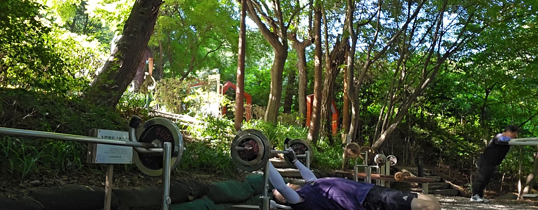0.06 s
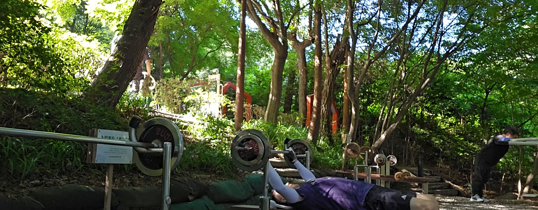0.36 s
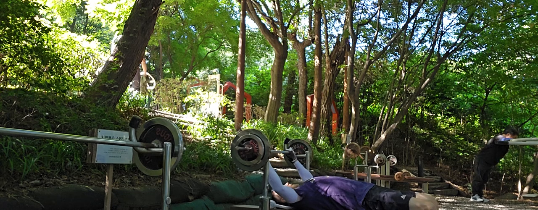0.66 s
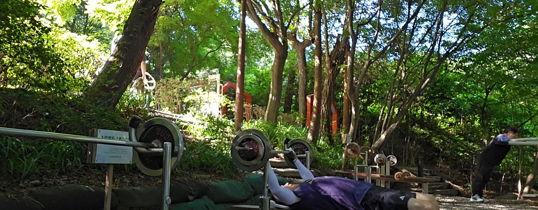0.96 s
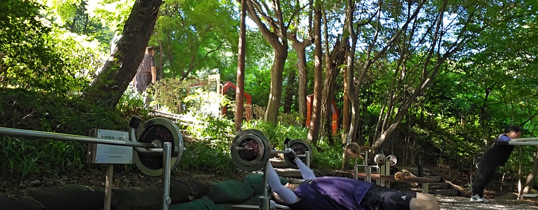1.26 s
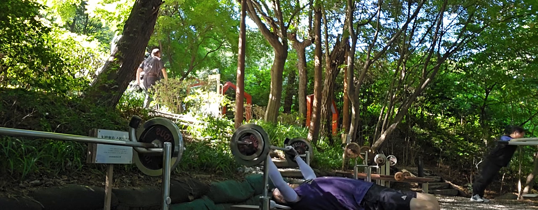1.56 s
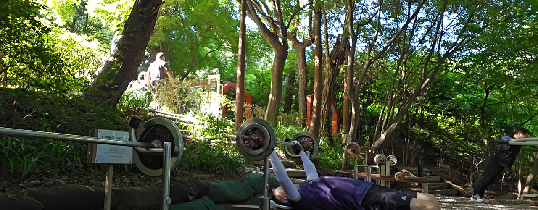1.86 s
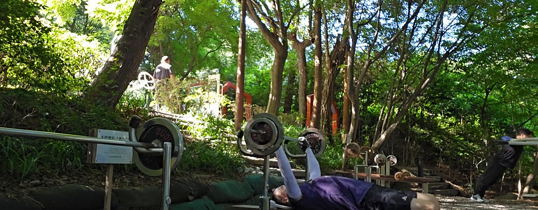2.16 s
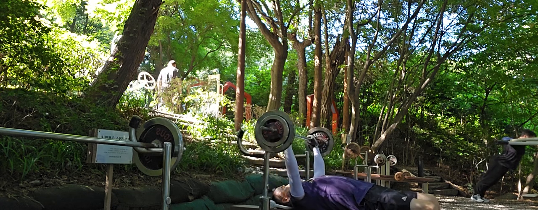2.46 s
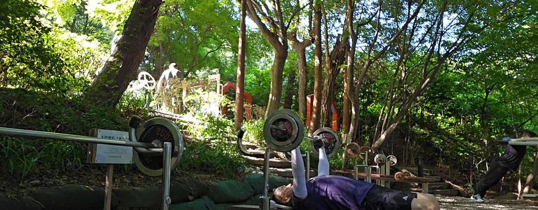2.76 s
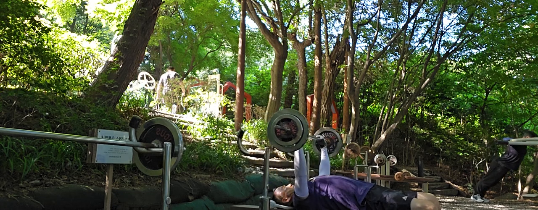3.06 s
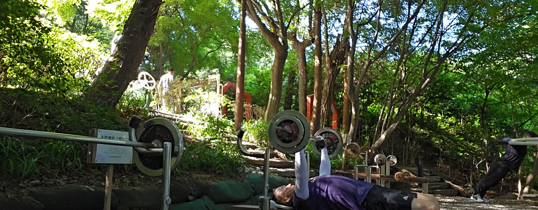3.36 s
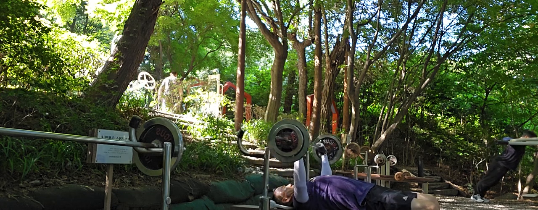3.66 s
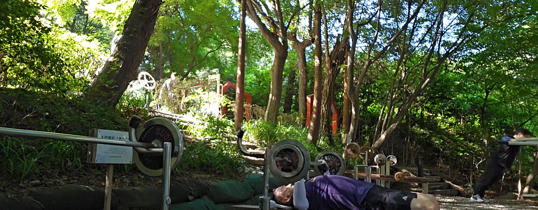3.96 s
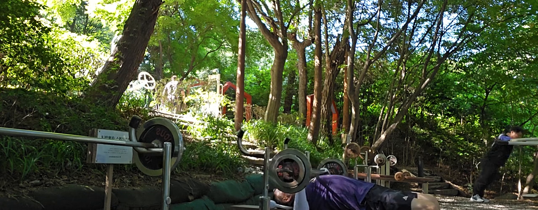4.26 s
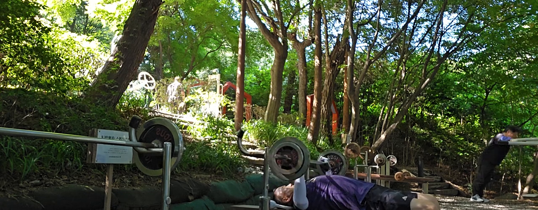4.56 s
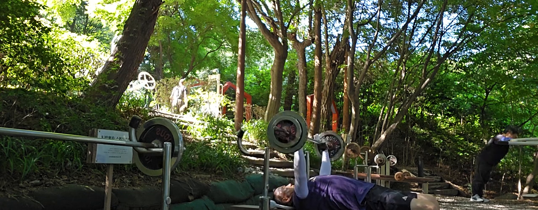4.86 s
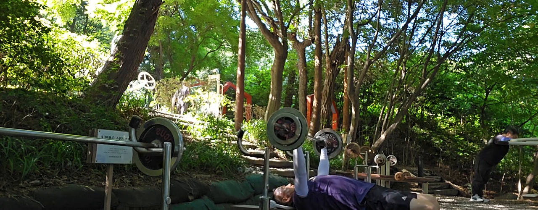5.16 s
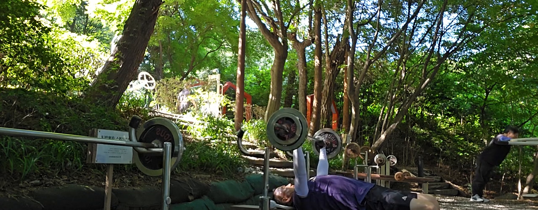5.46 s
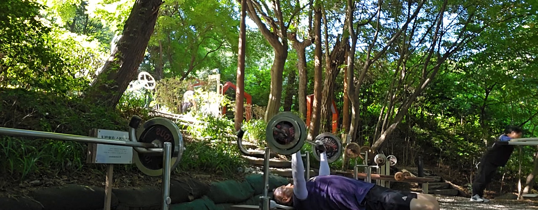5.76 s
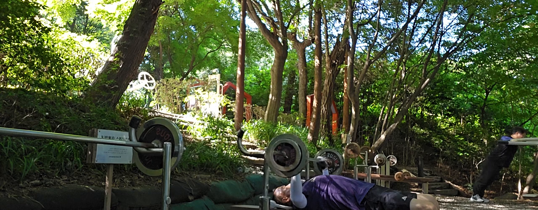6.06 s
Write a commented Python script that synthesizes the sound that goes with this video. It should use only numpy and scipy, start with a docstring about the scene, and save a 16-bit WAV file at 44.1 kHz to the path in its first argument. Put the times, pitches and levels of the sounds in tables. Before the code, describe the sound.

A steady distant traffic rumble and twittering birds, with a barbell tick, soft gritty scuffs and a short clink of sliding weight plates.

```python
"""Small birds chip and twitter over a low city rumble, at an outdoor gym in a wooded park.
A barbell ticks in its hook, shoes crush grit and heels knock on packed earth. About four seconds in,
the loose plates slide along the bar: friction makes them rasp and squeak, and impacts ring the steel.
Trunks and leaves scatter the birdsong and the sounds of the gym into a short reverberation."""
import sys
import numpy as np
from scipy import signal
from scipy.fft import rfft, irfft, next_fast_len
from scipy.io import wavfile
from scipy.ndimage import uniform_filter1d, map_coordinates

SR = 44100
rng = np.random.default_rng(int(sys.argv[2]) if len(sys.argv) > 2 else 0)


def persist_wave(psi):
    """Save psi, clipped to +-1, as 16-bit WAV."""
    counts = np.round(np.clip(psi, -1, 1) * 32767).astype(np.int16)
    wavfile.write(sys.argv[1], SR, np.atleast_2d(counts).T)


N = 274302


def amp(db):
    """Amplitude ratio of a level in decibels."""
    return 10 ** (np.asarray(db) / 20)


def unit(x):
    """Normalisation to rms 1."""
    return x / np.sqrt(np.mean(x ** 2) + 1e-20)


def along(points, hz):
    """Interpolation of (frequency, value) points on a logarithmic frequency axis."""
    point_hz, values = np.transpose(points)
    return np.interp(np.log(hz + 1), np.log(point_hz + 1), values)


def curves(rows, size):
    """Linear interpolation in time: one value per sample for each column after the first."""
    time_s, *columns = np.transpose(rows)
    return [np.interp(np.arange(size) / SR, time_s, column) for column in columns]


def wobble(rate, size=N):
    """Random modulation: a smooth curve through `rate` Gaussian values a second."""
    knots = rng.standard_normal(int(size * rate / SR) + 4)
    return map_coordinates(knots, [np.arange(size) * rate / SR])


def filtered(x, response):
    """Linear filtering: the spectrum of x times a frequency response."""
    size = x.shape[-1]
    padded = next_fast_len(size + 8192)
    return irfft(rfft(x, padded) * response(np.fft.rfftfreq(padded, 1 / SR)), padded)[..., :size]


def coloured(x, spectrum):
    """Spectral shaping by (frequency_hz, level_db) points, at rms 1."""
    return unit(filtered(x, lambda hz: amp(along(spectrum, hz))))


def add(track, start_s, sound):
    """Superposition of a sound on a track."""
    part = track[:, max(round(start_s * SR), 0):][:, :sound.shape[-1]]
    part += sound[..., :part.shape[-1]]


def grains(rate, spread_db, size=N):
    """Shot noise: a stereo train of tiny random fractures, `rate` a second."""
    impulses = (rng.random((2, size)) < rate / SR) * rng.standard_normal((2, size))
    return impulses * amp(spread_db * rng.standard_normal(size))


def diffuse(spectrum):
    """A diffuse field is coherent between two points in the bass and incoherent in the treble."""
    # frequency_hz, coherence
    likeness = [(30, 0.98), (120, 1), (250, 0.92), (500, 0.77), (1000, 0), (10000, 0.033)]

    def mid_and_side(hz):
        """Equal-power weights that give this coherence."""
        angle = np.arccos(np.clip(along(likeness, hz), -1, 1)) / 2
        return np.array([np.cos(angle), np.sin(angle)])

    mid, side = filtered(rng.standard_normal((2, N)), mid_and_side)
    return coloured(np.array([mid + side, mid - side]), spectrum)


def woods(x, wet_db, early_s=0.024):
    """Scattering by trunks and leaves adds strong single echoes early and a fading wash later."""
    # frequency_hz, t60_s
    reverberation = [(300, 0.74), (4000, 0.67), (8000, 0.67), (15000, 0.19)]
    size = SR // 2
    early = np.exp(-np.arange(size) / SR / early_s)
    trunks = 18 * early * (rng.random((2, size)) < 250 / SR)
    hz, t, spectra = signal.stft(rng.standard_normal((2, size)) * (1 + trunks), SR, nperseg=256)
    decay = amp(-60 * t / along(reverberation, hz)[:, None])
    tail = signal.istft(spectra * decay, SR, nperseg=256)[1]
    tail /= np.linalg.norm(tail, axis=1, keepdims=True)
    echo = signal.fftconvolve(np.atleast_2d(x), tail, axes=1)[:, :x.shape[-1]]
    return (x + amp(wet_db) * echo) / np.hypot(1, amp(wet_db))


def city():
    """Diffuse traffic rumble and receding tyre noise, low engine drones, and two faint high tones."""
    # centre_hz, width_hz, level_db
    drone_bands = [(57.24, 8, -54), (94.9, 8, -57), (224.9, 13, -69), (1287, 12, -89), (1866, 12, -88)]
    # frequency_hz, level_db
    rumble_spectrum = [(12, -41), (20, -7.5), (43, -2), (68, 0.5), (97, -3.5), (161, -11), (227, -12.5),
                       (330, -25.5), (430, -52.5), (730, -120)]
    # frequency_hz, level_db
    tyre_spectrum = [(200, -12), (290, -4), (400, -2.5), (560, -7.5), (700, -10), (900, -13.5), (1200, -18),
                     (1700, -23.5), (2050, -33.5), (2600, -60.5)]
    t = np.arange(N) / SR
    drones = np.zeros(N)
    for hz, width_hz, db in drone_bands:
        modulation = wobble(width_hz) + 1j * wobble(width_hz)
        drones += amp(db) * unit(np.real(modulation * np.exp(2j * np.pi * hz * t)))
    rumble = amp(-46.5 + 1.1 * wobble(4.94)) * diffuse(rumble_spectrum)
    tyres = amp(-61.5 - 0.3842 * t + 1.22 * wobble(9)) * diffuse(tyre_spectrum)
    return rumble + tyres + drones


def patchy(x, depth_db):
    """Modulation in patches of time and frequency, as when single branches rustle in turn."""
    spectra = signal.stft(x, nperseg=512)[2]
    across_bands = uniform_filter1d(rng.standard_normal(spectra.shape[1:]), size=5, axis=0)
    patches = unit(uniform_filter1d(across_bands, size=14, axis=1))
    return unit(signal.istft(spectra * amp(depth_db * patches), nperseg=512)[1][:, :N])


def leaves():
    """Wind excites broadband noise in the foliage, which swells with each breath."""
    # peak_s, lift_db, half_length_s
    gusts = [(0, 5.5, 0.16), (0.853, 3, 0.65), (3.453, 5, 0.6), (4.41, 7.5, 0.15)]
    # frequency_hz, level_db
    rustle_spectrum = [(1500, -8), (2100, 3), (2650, 3.5), (3300, 4.5), (4300, 3.5), (5000, -1.5),
                       (5800, -5), (6400, -0.5), (6850, -12.5), (7350, 0.5), (8300, -15), (9300, -37),
                       (15500, -33.5)]
    t = np.arange(N) / SR
    gust_db = sum(db * np.exp(-((t - peak_s) / half_s) ** 2) for peak_s, db, half_s in gusts)
    return amp(-77.5 + gust_db + wobble(5.1)) * patchy(diffuse(rustle_spectrum), depth_db=2.5)


def hiss():
    """Self-noise of the microphones, faint and high."""
    # frequency_hz, level_db
    spectrum = [(8000, -21), (10000, -8.5), (11000, -7), (11700, 2.5), (12500, -0.5), (15500, -2.5)]
    return amp(-96) * diffuse(spectrum)


def bird(shape, calls, rough, flutter_db, wet_db, pan_db):
    """A gliding whistle with a faint octave quavers by random frequency and amplitude modulation."""
    out, size = np.zeros((2, N)), SR // 2
    pitch_hz, contour_db = curves(shape, size)
    t = np.arange(size) / SR
    length_s = shape[-1][0]
    gate = np.clip(np.minimum(t, length_s - t) / 0.00066, 0, 1)
    for start_s, db, ratio in calls:
        phase = 2 * np.pi * np.cumsum(pitch_hz * ratio * (1 + rough * wobble(294.2, size))) / SR
        whistle = np.sin(phase) + amp(-44) * np.sin(2 * phase)
        envelope = gate * amp(db + contour_db + flutter_db * wobble(120.2, size))
        call = np.sqrt(2) * envelope * whistle
        scattered = woods(call, wet_db, early_s=0.034)
        add(out, start_s, call.std() * unit(scattered))  # smeared, with its energy kept
    return out * amp([[pan_db / 2], [-pan_db / 2]])


def arched_song():
    """Frequency modulation: a bird in the canopy repeats one rising and falling syllable."""
    # time_s, pitch_hz, level_db
    arch = [(0, 3533, -7.5), (.007, 3662, -6.5), (.017, 3830, -5), (.031, 4130, 1), (.044, 4400, -3.5),
            (.056, 4468, -4.5), (.066, 4100, -3.5), (.078, 3730, -7.5), (.1, 3653, -11.5)]
    # start_s, level_db, pitch_ratio
    calls = [(0.727, -58.5, 0.99), (1.083, -60, 0.98), (1.413, -60.5, 0.97), (2.904, -58.5, 0.995),
             (3.243, -60, 0.99), (3.573, -58, 1), (3.885, -59, 0.99), (4.481, -58, 0.98)]
    return bird(arch, calls, rough=0.017, flutter_db=2, wet_db=6, pan_db=-1)


def far_song():
    """Scattered sound outweighs direct in a far bird's hoarse slur, high whistle and quick drop."""
    # time_s, pitch_hz, level_db
    slur = [(0, 3640, -8), (.012, 4200, 0.5), (.028, 4850, -2), (.044, 5390, -5.5)]
    # time_s, pitch_hz, level_db
    crest = [(0, 5990, -6), (.014, 6140, -6), (.028, 6430, 2), (.05, 6480, -1.5), (.066, 6320, -8)]
    # time_s, pitch_hz, level_db
    drop = [(0, 4590, -10), (.008, 3870, 0.5), (.018, 3250, -2.5)]
    # start_s, slur_db, crest_db, drop_db, pitch_ratio
    phrases = [(4.751, -65.5, -66.5, -81, 1), (5.062, -67, -64.5, -66.5, 1), (5.327, -65.5, -68, -64, 1),
               (5.595, -65, -64.5, -63.5, 0.95)]
    slurs = [(s, db, ratio) for s, db, _, _, ratio in phrases]
    crests = [(s + 0.06, db, ratio) for s, _, db, _, ratio in phrases]
    drops = [(s + 0.127, db, ratio) for s, _, _, db, ratio in phrases]
    return (bird(slur, slurs, rough=0.05, flutter_db=4, wet_db=13, pan_db=1)
            + bird(crest, crests, rough=0.021, flutter_db=3.5, wet_db=12, pan_db=-0.5)
            + bird(drop, drops, rough=0.07, flutter_db=3, wet_db=13, pan_db=-1))


def twitter():
    """The ratio of scattered to direct sound sets each short glide at its own depth in the trees."""
    # start_s, length_s, level_db, first_hz, last_hz, wet_db
    notes = [(0.059, 0.045, -71, 6370, 6500, 6), (0.074, 0.034, -70, 4480, 4630, 2),
             (0.172, .015, -59.5, 5650, 5930, -19), (0.848, 0.037, -79, 6330, 6270, 2),
             (0.858, 0.015, -72, 5700, 4960, -1), (.898, .014, -69, 5250, 5950, 1),
             (.913, .014, -72, 5850, 5300, -2), (0.956, 0.032, -71.5, 6120, 6300, 1),
             (2.439, 0.041, -68, 6300, 6270, 5), (2.467, 0.023, -65.5, 5100, 4930, -1),
             (2.573, 0.021, -73.5, 5360, 6000, 1), (2.613, 0.028, -63, 4210, 5000, -2),
             (2.824, 0.037, -75.5, 7680, 7000, 10), (2.858, 0.051, -70.5, 6620, 5560, 10),
             (2.987, 0.047, -66.5, 7080, 7600, 8), (5.411, 0.031, -68, 4360, 4290, 2.5),
             (5.44, 0.041, -70, 4950, 4880, 4), (5.685, .03, -75, 4140, 4137, 2),
             (5.763, 0.029, -75.5, 4170, 4700, 2)]
    out, edge_db = np.zeros((2, N)), -6
    for start_s, length_s, db, first_hz, last_hz, wet_db in notes:
        middle_hz = (first_hz + last_hz) / 2
        glide = [(0, first_hz, edge_db), (length_s / 2, middle_hz, 0), (length_s, last_hz, edge_db)]
        out += bird(glide, [(start_s, db, 1)], rough=0.022, flutter_db=2.5, wet_db=wet_db, pan_db=2.5)
    return out


def near_chips():
    """Biphonation: one side of a nearer bird's syrinx sweeps upward while the other holds a note."""
    # time_s, pitch_hz, level_db
    sweep = [(0, 4500, -18), (.006, 4850, -2), (.012, 5700, -2.5), (.017, 6600, -3.5), (.021, 6900, -11)]
    # time_s, pitch_hz, level_db
    pip = [(0, 5100, 1), (.006, 5280, 1.5), (.014, 5300, -4), (.02, 5150, -13.5)]
    # start_s, sweep_db, pip_db, pitch_ratio
    chips = [(.174, -60.5, -57.5, 1.025), (.289, -62, -61, 1.0), (2.615, -75, -74, 0.95)]
    sweeps = [(s, db, ratio) for s, db, _, ratio in chips]
    pips = [(s + 0.01, db, ratio) for s, _, db, ratio in chips]
    return (bird(sweep, sweeps, rough=0.0093, flutter_db=2.5, wet_db=-5, pan_db=2.5)
            + bird(pip, pips, rough=0.006, flutter_db=1, wet_db=-13, pan_db=0))


def footfalls():
    """Inelastic impact: a heel lands on packed earth with a short, dull knock."""
    # start_s, level_db, decay_s
    steps = [(1.036, -53.5, 0.012), (3.711, -53, .015), (3.741, -57, 0.02), (4.435, -59.5, .018)]
    # frequency_hz, level_db
    earth_spectrum = [(200, -10.5), (450, 2), (680, 1.5), (1000, -5.5), (1500, -13.5), (3000, -32),
                      (6000, -69)]
    out, t = np.zeros((2, N)), np.arange(SR // 5) / SR
    for start_s, db, decay_s in steps:
        envelope = amp(db) * (1 - np.exp(-t / 0.0018)) * np.exp(-t / decay_s)
        add(out, start_s, envelope * coloured(rng.standard_normal(len(t)), earth_spectrum))
    return woods(out, wet_db=-5)


def shoes():
    """Granular fracture: each scuff crushes a swell of grit; weight on the foot adds a lower crunch."""
    # peak_s, level_db, rise_s, crunch_db, tilt_db_per_octave
    scuffs = [(0.394, -76.5, .012, -11, 11.5), (.471, -56, .015, -9.5, 7.5), (.545, -68, 0.033, 1.5, 0.5),
              (.648, -69.5, 0.021, 9.5, 1), (.706, -59, 0.012, -11, 3), (1.043, -73.5, 0.0043, 8, 0),
              (1.058, -62.5, .013, 0.5, 5.5), (1.237, -63, 0.018, 0.5, 6.5), (1.87, -76, 0.082, 7, -2.5),
              (2.475, -68.5, 0.044, 2, 0), (3.121, -72.5, 0.055, 6, -5.5), (3.431, -88.5, .04, 8, -21.5),
              (3.719, -78.5, .004, 12, -3), (3.735, -79.5, 0.067, 12, -2), (4.148, -68, 0.012, -1.5, 12.5),
              (4.615, -64.5, 0.016, -7, 0), (4.917, -69, 0.045, 1, -2.5), (5.555, -67.5, 0.061, -3.5, -5),
              (5.645, -72.5, .038, -24, 4.5), (6.119, -75, 0.076, -13, -3)]
    # frequency_hz, level_db
    grit_spectrum = [(1500, -24), (3000, -15.5), (5000, -3.5), (6500, -2.5), (7500, 3), (8200, -7),
                     (9200, -23.5), (11000, -15.5), (15500, -17.5)]
    # frequency_hz, level_db
    crunch_spectrum = [(200, -3.5), (550, 6.5), (1000, -6), (1600, -3), (2100, -8), (2700, -4.5),
                       (3600, -3.5), (4600, -13), (7000, -11.5), (10000, -43.5)]
    out, t = np.zeros((2, N)), np.arange(-SR // 5, SR // 2) / SR
    for peak_s, db, rise_s, crunch_db, tilt in scuffs:
        settle_s = 0.022 + 0.79 * rise_s  # slower scuffs settle longer
        swell = np.exp(-np.where(t < 0, (t / rise_s) ** 2, t / settle_s))
        clumps_db = 1.3 * wobble(80, len(t))  # grit gives way in clumps
        tilted = [(hz, level + tilt * np.log2(hz)) for hz, level in grit_spectrum]
        grit = coloured(grains(rate=6500, spread_db=1, size=len(t)), tilted)
        crunch = amp(crunch_db) * coloured(grains(rate=2200, spread_db=4.5, size=len(t)), crunch_spectrum)
        add(out, peak_s + t[0], amp(db + clumps_db) * swell * (grit + crunch))
    return woods(out, wet_db=-6.5)


def rack():
    """Damped resonance: the bar ticks in its hook, and the gripping hands absorb the ring."""
    # start_s, level_db
    ticks = [(0.3705, -57), (0.3748, -50)]
    # frequency_hz, level_db
    hook_spectrum = [(600, -15), (1100, 18), (1450, -19), (1900, 8), (2700, -11), (3800, 1), (5800, 6),
                     (7800, 3), (9500, -21), (15000, -24)]
    out, t = np.zeros((2, N)), np.arange(SR // 10) / SR
    attack_s, t60_s = 0.00076, 0.028
    envelope = (1 - np.exp(-t / attack_s)) * amp(-60 * t / t60_s)
    for start_s, db in ticks:
        add(out, start_s, amp(db) * envelope * coloured(rng.standard_normal((2, len(t))), hook_spectrum))
    return woods(out * amp([[-1], [1]]), wet_db=-11)


def plate_squeaks():
    """Stick-slip oscillation of the turning plates swells into short, unsteady tones."""
    # peak_s, level_db, pitch_hz, half_length_s, roughness_ratio
    squeaks = [(4.19, -67.5, 1500, 0.044, 0.058), (4.245, -62, 1545, 0.0068, .008),
               (4.281, -55, 860, 0.017, 0.01), (4.322, -68, 840, 0.0059, 0.012),
               (4.39, -70, 1355, 0.018, 0.016), (4.434, -69, 1685, 0.0073, 0.013),
               (4.522, -71.5, 1685, .011, .012), (4.639, -74.5, 1677, 0.017, 0.013),
               (5.253, -61.5, 1390, 0.017, 0.018)]
    out, t = np.zeros((2, N)), np.arange(-SR // 5, SR // 5) / SR
    for peak_s, db, hz, half_s, rough in squeaks:
        pitch_hz = hz * (1 + rough * wobble(250.4, len(t)))
        tone = np.sin(2 * np.pi * np.cumsum(pitch_hz) / SR)
        add(out, peak_s + t[0], amp(db) * np.exp(-(t / half_s) ** 2) * tone)
    return woods(out * amp([[1.5], [-1.5]]), wet_db=-9)


def plate_slide():
    """Sliding friction: the plates rasp once along the sleeve, and the steel sings on."""
    # frequency_hz, level_db
    rasp_spectrum = [(880, -30), (1500, -7), (1590, -11.5), (1650, -18), (2330, -23.5), (3030, -11),
                     (3380, -14), (4020, -4), (4800, -10.5), (6130, -13.5), (7520, -3), (8620, -22),
                     (12600, -19), (15500, -19)]
    peak_s, attack_s, hold_s, release_s, ring_s = 4.212, 0.021, 0.052, 0.024, 0.22
    t = np.arange(N) / SR - peak_s
    swell = np.exp(np.minimum(t, 0) / attack_s - np.maximum(t - hold_s, 0) / release_s)
    ring = amp(-20.5) * (t > 0) * np.exp(-np.abs(t) / ring_s)
    rasp = coloured(grains(rate=5800, spread_db=0.5), rasp_spectrum)
    return amp(-52.5) * np.maximum(swell, ring) * rasp


def plate_clinks():
    """Modal vibration: each contact excites one band of the decaying modes of bar and plates."""
    # frequency_hz, level_db, t60_s
    steel_modes = [(865, 20, 0.069), (1378, 1, 0.18), (1530, 4.5, 0.13), (1690, -18, 1), (2660, -11, 0.75),
                   (3100, -4, 0.13), (3800, -4, 0.37), (3980, 2, 0.16), (4440, -6, 0.19), (4800, -7, .25),
                   (5340, -13, .2), (6400, -6, 0.18), (7240, -3, 0.18), (7590, -4, .18)]
    # start_s, level_db, centre_hz, spread_octaves
    contacts = [(4.199, -56, 1540, .07), (4.221, -56.5, 4000, .42), (4.238, -63, 1750, 0.52),
                (4.292, -63, 3200, 0.71), (4.316, -64.5, 1200, 0.41)]
    out, t = np.zeros((2, N)), np.arange(SR // 2) / SR
    hz, mode_db, t60_s = np.transpose(steel_modes)[:, :, None]
    attack = 1 - np.exp(-t / 0.0021)
    for start_s, db, centre_hz, spread_octaves in contacts:
        band = np.exp(-(np.log2(hz / centre_hz) / spread_octaves) ** 2 / 2)
        strength = band * amp(db + mode_db + rng.normal(0, 0.53, hz.shape))
        phase = 2 * np.pi * (hz * t + rng.random((2, len(hz), 1)))
        modes = strength * amp(-60 * t / t60_s) * np.sin(phase)
        add(out, start_s, attack * modes.sum(axis=1))
    return woods(out, wet_db=-4.5)


def microphones(hz):
    """Interference from nearby posts combs the treble; the left has more upper middle and later bass."""
    # left_delay_s, right_delay_s, level_db
    posts = [(.0019, 0.0014, -20), (.0034, 0.0035, -21.5), (.0047, 0.0073, -14), (.0072, 0.0073, -22.5),
             (.0088, 0.011, -15), (0.0124, 0.011, -21), (0.0171, .0192, -21)]
    # frequency_hz, left_minus_right_db
    balance = [(300, 0), (1000, 2), (1600, 0), (2400, 5.5), (4000, 12.5), (5500, 6.5), (7000, -1),
               (12000, 1.5)]
    # frequency_hz, left_lag_rad
    phase_lag = [(25, 0.38), (60, 0.27), (125, .18), (250, 0.14), (600, 0)]
    echoes = sum(amp(db) * np.exp(-2j * np.pi * hz * np.array([[left_s], [right_s]]))
                 for left_s, right_s, db in posts)
    comb = 1 + echoes * hz ** 2 / (hz ** 2 + 700 ** 2)  # long waves diffract around a post
    lean = amp(along(balance, hz) * np.array([[1], [-1]]) / 2)
    lag = np.exp(1j * along(phase_lag, hz) * np.array([[-1], [1]]) / 2)
    return comb * lag * lean / np.sqrt(np.mean(lean ** 2, axis=0))


def scene():
    """Superposition of gym, birds and background at the two microphones."""
    feet = shoes() + footfalls()
    barbell = woods(plate_slide(), wet_db=-4.5) + plate_clinks() + plate_squeaks() + rack()
    birds = arched_song() + near_chips() + far_song() + twitter()
    background = city() + leaves() + hiss()
    return filtered(background + amp(0.5) * (birds + feet + barbell), microphones)


def record(dry):
    """Band limiting: an ideal low-pass filter removes the highest treble."""
    return filtered(dry, lambda hz: hz < 15720)


dry = scene()
out = record(dry)
persist_wave(out)
```